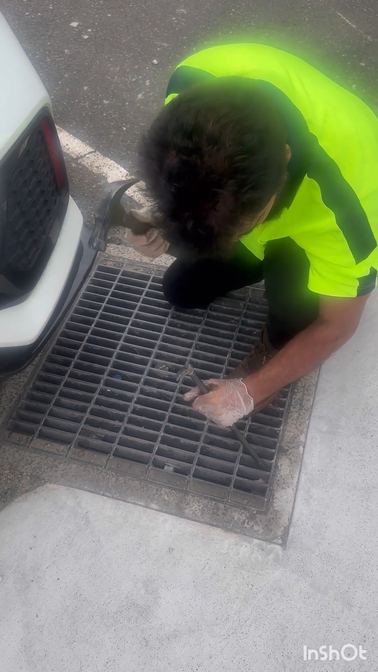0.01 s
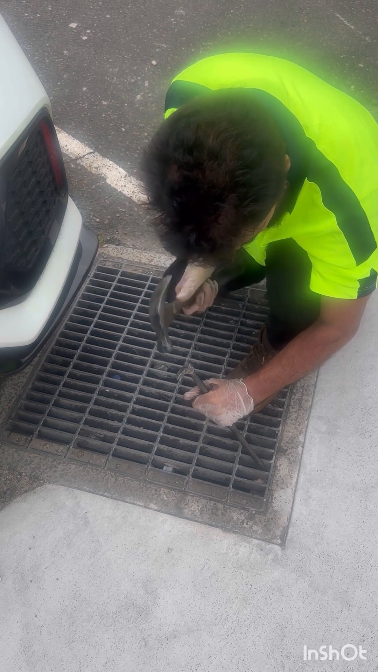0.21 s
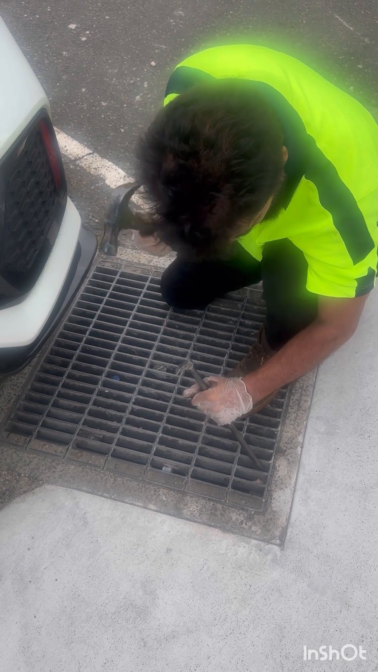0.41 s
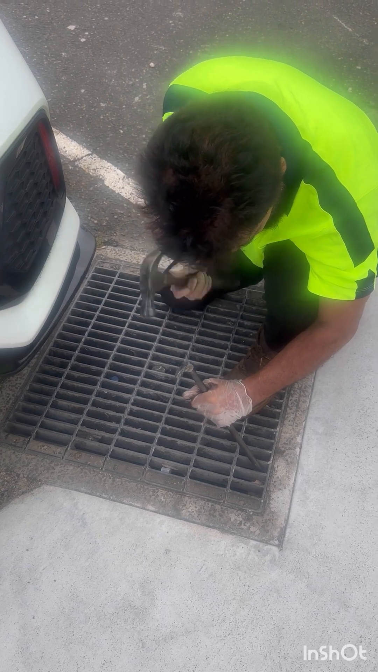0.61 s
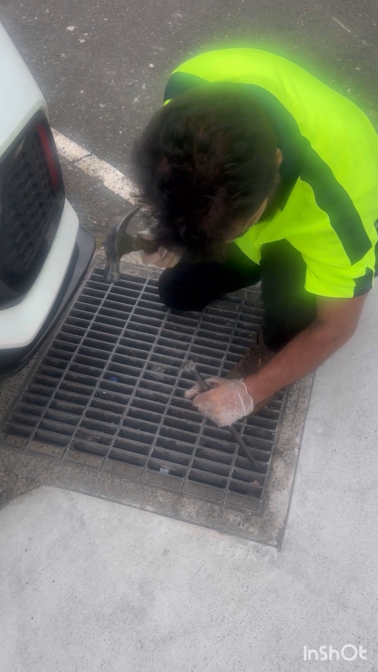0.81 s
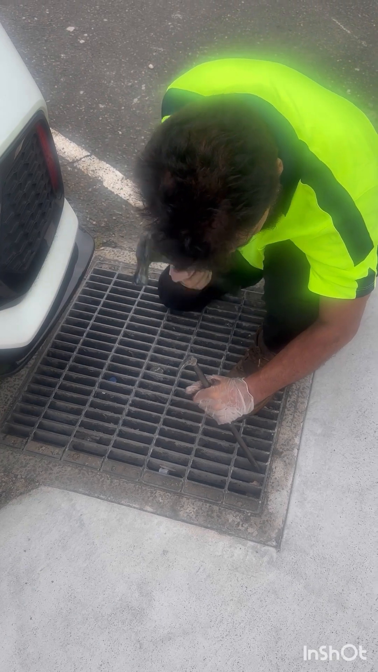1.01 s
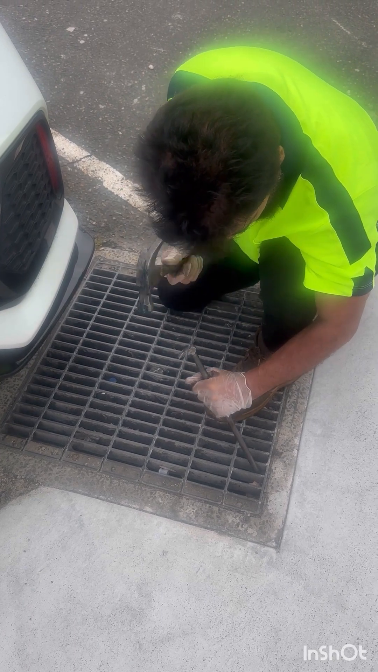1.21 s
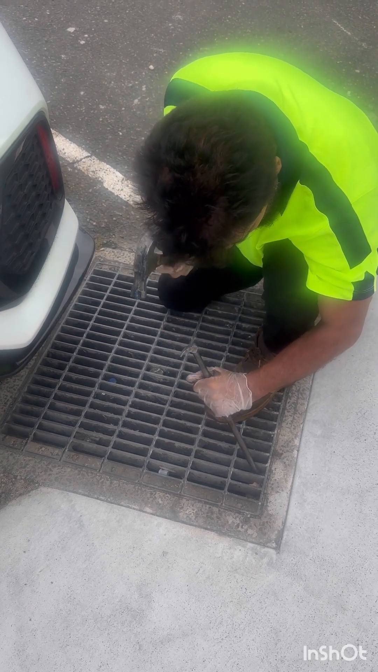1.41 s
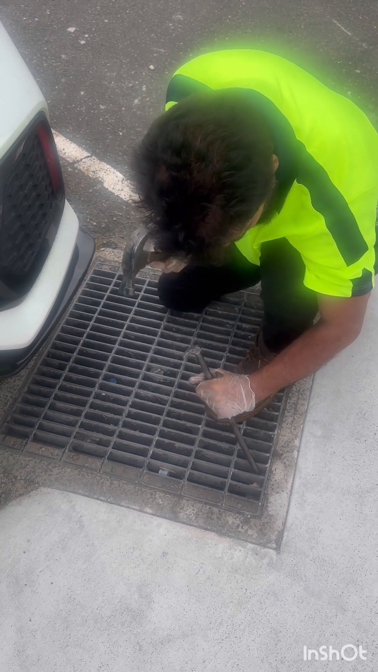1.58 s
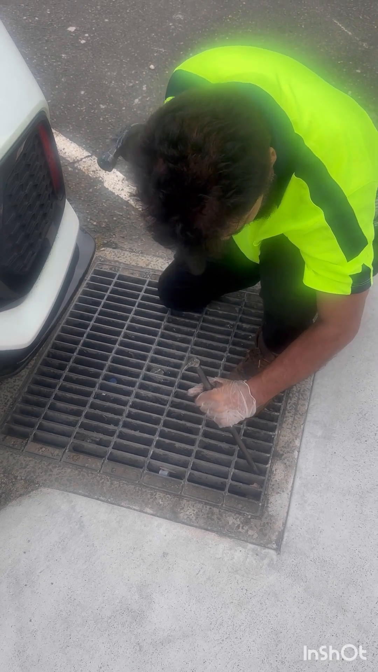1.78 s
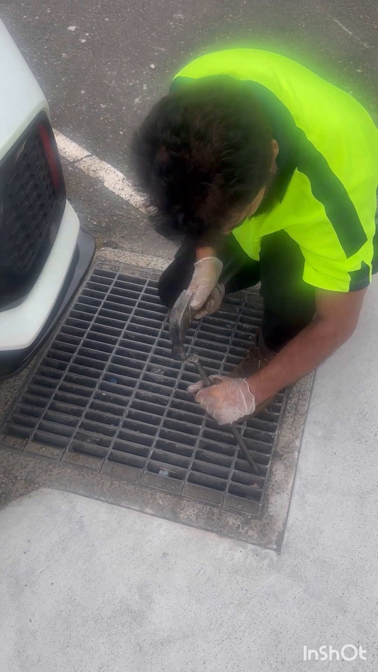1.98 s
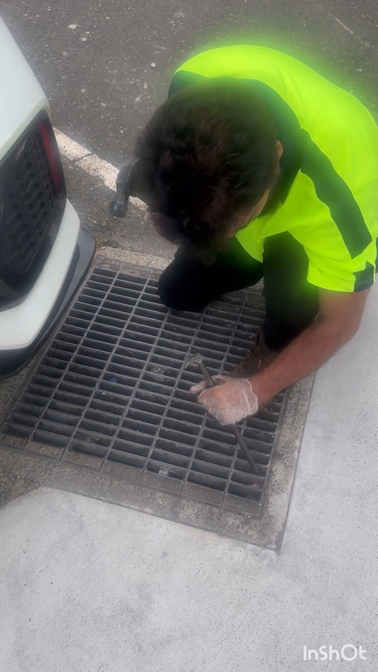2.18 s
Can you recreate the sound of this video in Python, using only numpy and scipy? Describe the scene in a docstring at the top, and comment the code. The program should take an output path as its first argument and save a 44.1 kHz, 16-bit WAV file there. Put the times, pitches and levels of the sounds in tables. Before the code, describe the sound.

A hammer strikes a steel bar wedged in a metal grate, four sharp clanking blows outdoors

```python
"""Far traffic rumbles throughout, as patchy filtered noise; the fading end of an earlier blow opens the scene.
Then a hammer strikes a steel bar wedged in a drain grate beside a parked car, close to the listener, four times.
Each blow is a noise crack, damped modes of bar and hollow, and rattling grate noise, echoed by car and street.
The first of the four also sends a low thump of falling pitch. Small knocks, made of noise bursts, and faint
wavering sine tones come between blows."""
import sys
import numpy as np
from scipy import signal
from scipy.fft import rfft, irfft, next_fast_len
from scipy.io import wavfile
from scipy.ndimage import uniform_filter1d, map_coordinates

SR = 44100
rng = np.random.default_rng(int(sys.argv[2]) if len(sys.argv) > 2 else 0)


def master(y):
    """Save y as 16-bit WAV."""
    cut = np.clip(np.atleast_2d(y).T, -1, 1)
    pcm = np.round(cut * 32767)  # scale
    wavfile.write(sys.argv[1], SR, pcm.astype(np.int16))


N = 97020
LEAD_IN_S = 1  # room ahead of the scene for a blow that falls before its start


def amp(db):
    """Level law: 20 dB is a factor of ten in amplitude."""
    return 10 ** (np.asarray(db) / 20)


def unit(x):
    """Normalisation to an RMS of one."""
    return x / np.sqrt(np.mean(x ** 2) + 1e-20)


def along(points, hz):
    """Interpolation of (Hz, value) points on a logarithmic frequency axis."""
    f, v = np.transpose(points)
    return np.interp(np.log(hz + 1), np.log(f + 1), v)


def filtered(x, response):
    """Linear filtering: the spectrum is multiplied by a response of frequency."""
    m = next_fast_len(x.shape[-1] + 8192)
    spectrum = rfft(x, m) * response(np.fft.rfftfreq(m, 1 / SR))
    return irfft(spectrum, m)[..., :x.shape[-1]]


def bump(centre_hz, sharpness):
    """Band-pass response, symmetric about its centre on a logarithmic frequency axis."""
    return lambda hz: 1 / (1 + (sharpness * np.log((hz + 1) / centre_hz)) ** 4)


def spread(pair, alike):
    """Interchannel coherence: mid and side shares set how alike left and right are at each frequency."""
    def shares(hz):
        turn = np.arccos(np.clip(along(alike, hz), -1, 1)) / 2
        return np.array([np.cos(turn), np.sin(turn)])

    mid, side = filtered(pair, shares)
    return np.array([mid + side, mid - side])


def dying(colour, decay, size):
    """Frequency-dependent damping: in a pair of noises each frequency dies at its own speed."""
    hz, t, z = signal.stft(rng.standard_normal((2, size)), SR, nperseg=256)
    level_db = along(colour, hz)[:, None] - 60 * t / along(decay, hz)[:, None]
    return signal.istft(z * amp(level_db), SR, nperseg=256)[1][:, :size]


def add_at(out, start_s, part):
    """Superposition: a part is added to the padded pair from its start time onward."""
    out[:, round((start_s + LEAD_IN_S) * SR):][:, :part.shape[1]] += part


def traffic():
    """Superposed random sources: patchy, partly coherent far noise over a deep rumble that swells by itself."""
    # Each row: frequency in Hz, relative spectral density of the far noise in dB per Hz.
    wash_colour = [(15, -60), (25, -32), (50, -8), (70, -5.5), (162, -14.5), (266, -10.5), (308, -21.5),
                   (446, -15.5), (530, -25), (630, -20), (2630, -38.5), (9000, -54), (11700, -100),
                   (19800, -120)]
    # Each row: time in seconds, level of the deep rumble in dB.
    rumble_level = [(0.0, -46.5), (0.2, -42.5), (0.54, -49), (0.77, -47.5), (1.07, -60), (1.57, -67.5),
                    (1.75, -50), (1.92, -49), (2.2, -50.5)]
    # Each row: frequency in Hz, likeness of left and right [0 to 1].
    alike_far = [(100, 1), (300, .9), (640, .2), (1200, 0), (1900, .6), (2700, .2), (5000, .1), (6200, .85),
                 (10000, .7)]
    wash_db, rumble_hz, patch_db = -52, 60, .5

    z = signal.stft(rng.standard_normal((3, N)), nperseg=512)[2]
    patches = uniform_filter1d(rng.standard_normal(z.shape[1:]), 5, 0)  # smoothed over frequency
    patches = uniform_filter1d(patches, 12, 1)  # and over time
    noise = signal.istft(z * amp(patch_db * unit(patches)), nperseg=512)[1][:, :N]
    colour = [(6, -46)] + wash_colour + [(10500, -120)]  # the last point silences all above 10.5 kHz
    wash = unit(filtered(spread(noise[:2], alike_far), lambda hz: amp(along(colour, hz))))
    low = unit(filtered(noise[2], bump(rumble_hz, 1.6)))
    rumble_db = np.interp(np.arange(N) / SR, *np.transpose(rumble_level))
    return amp(wash_db) * wash + amp(rumble_db) * low


def crack(t, db, t60):
    """Impact noise: a broadband burst with exponential decay."""
    # Each row: frequency in Hz, relative level in dB.
    crack_colour = [(150, -20.5), (600, -24.5), (1250, -12), (1900, -6.5), (2370, -14.5), (2900, -6.5),
                    (3900, -14.5), (4700, -17.5), (5900, -5.5), (6800, -2), (8200, -8), (10500, -17),
                    (13000, -24), (15500, -26.5)]
    noise = unit(filtered(rng.standard_normal((2, len(t))), lambda hz: amp(along(crack_colour, hz))))
    return amp(db - 60 * t / t60) * noise


def ringing(t):
    """Modal superposition: damped modes of bar and hollow, with new levels and wandering phases each time."""
    # Steel bar. Each row: mode frequency in Hz, mean level in dB before the blow's ring level, t60 in seconds.
    bar_modes = [(1145, -8, .2), (1220, -9, .12), (1370, -8, .15), (1772, -5, .14), (2020, -7, .1),
                 (2510, -12, .14), (2702, -10, .13), (3200, -10, .1), (3553, -11, .12), (4120, -12, .15),
                 (5030, -11, .16), (5940, -10, .07), (6180, -6, .22), (6745, -7, .26), (7330, -12, .12),
                 (7660, -12, .12), (8220, -10, .2), (14550, -22, .1), (15600, -22, .08)]
    # Hollow under the grate. Each row: the same three columns in Hz, dB and seconds.
    pit_modes = [(105, -10, 0.17), (288.9, -7, 0.13), (518, -15.5, 0.12), (648.3, -1, 0.027),
                 (896, -7.5, .07)]
    blur_hz = 26  # the wedged bar chatters: line width that the phase walk gives each mode

    hz, db, t60 = np.transpose(bar_modes + pit_modes)
    gains = amp(db[:, None] + rng.normal(0, 3, (2, len(hz), 1)) - 60 * t / t60[:, None])
    walk = rng.standard_normal((len(hz), len(t))).cumsum(axis=1) * np.sqrt(2 * np.pi * blur_hz / SR)
    start_phase = rng.uniform(0, 2 * np.pi, (2, len(hz), 1))
    return (gains * np.sin(2 * np.pi * np.outer(hz, t) + walk + start_phase)).sum(axis=1)


def grate(t):
    """Random amplitude modulation: a rattle roughens noise that dies at its own speed at each frequency."""
    # Each row: frequency in Hz, level in dB before the gain below.
    grate_colour = [(120, -18.5), (310, -12.5), (450, -18.5), (800, -19), (1300, -7.5), (1950, -3),
                    (2370, -9), (2750, -5), (3500, -3), (5000, -1.5), (6700, -13), (8500, -13),
                    (10500, -16.5), (12000, -30), (15500, -33.5)]
    # Each row: frequency in Hz, t60 in seconds.
    grate_decay = [(300, 0.4), (1500, 0.15), (5000, 0.15), (10000, 0.31), (15000, .08)]
    gain_db = 12  # over the bar's ring
    grit_db, grit_per_s = 3.5, 200  # depth of the rattle, new random levels per second

    grit = amp(grit_db * map_coordinates(rng.standard_normal(400), [t * grit_per_s]))
    return amp(gain_db) * grit * dying(grate_colour, grate_decay, size=len(t))


def street(x):
    """Diffuse reverberation: convolution with a decaying noise tail."""
    # Each row: frequency in Hz, t60 in seconds.
    street_decay = [(500, .35), (2000, 0.73), (6500, 0.75), (8500, 0.64), (10500, 0.41), (15000, .2)]
    tail = dying([(1000, 0)], street_decay, size=SR)  # starts with a flat spectrum
    return signal.fftconvolve(x, tail / np.linalg.norm(tail[0]), axes=1)


def blows():
    """Impact excitation and reflection: crack, bar and grate, each blow with near echoes and a street tail."""
    # Each row: start in seconds, crack level in dB, crack t60 in seconds, ring level in dB, street tail in dB,
    # then seven colour gains in dB, applied to crack and ring alike. The first blow falls before the start.
    blow_rows = [(-.21, -3.5, 0.021, -21.5, -24, 20.5, 23.5, -1.8, -3.5, 0, -0.34, 1),
                 (0.21, 0, 0.0088, -26.5, -23, 2.5, -2.5, -2.5, -1, -5, 0, 5),
                 (0.6236, -3.5, 0.012, -27.5, -27, -4.5, -2.5, 0.38, -0.5, -2, 0.86, 4),
                 (1.033, -8, .03, -26.5, -28.5, 2.5, -0.5, 2, 5, 2.4, -1, 8),
                 (1.925, -2.5, 0.023, -28.5, -31, -2, 0, 0.26, -7, -1.4, -0.33, -4.5)]
    # Frequencies in Hz of the seven colour gains.
    colour_hz = [300, 750, 1400, 2350, 3600, 7000, 15000]
    rise_s = .0004
    car_s, car_db = .0145, -7  # first echo
    wall_s, wall_db = .043, -21  # later echo
    street_s = .02

    out, t = np.zeros((2, N + 3 * SR)), np.arange(SR // 3) / SR
    for s, crack_db, crack_t60, ring_db, street_db, *colour in blow_rows:
        hit = crack(t, crack_db, crack_t60) + amp(ring_db) * (ringing(t) + grate(t))
        hit = hit * (1 - np.exp(-t / rise_s))
        points = list(zip(colour_hz, colour))
        hit = filtered(hit, lambda hz: amp(along(points, hz)))
        echo = signal.lfilter([.3], [1, -.7], hit)  # reflection dulls the treble
        add_at(out, s, hit)
        add_at(out, s + car_s, amp(car_db) * echo)
        add_at(out, s + wall_s, amp(wall_db) * echo[::-1])  # left and right swapped
        add_at(out, s + street_s, amp(street_db) * street(hit))
    return out


def thump():
    """Chirp with pitch inversely proportional to time: a low swing that swells and dies."""
    start_s, crest_s = .2105, .0165  # crest_s counts from the start
    cycles = 1.5  # pitch in Hz times seconds since the start
    crest_db = -12  # of the main swell
    early, early_s = .75, .0045  # share and decay time of the first quick swings

    t = np.clip(np.arange(N) / SR - start_s, 1e-9, None)
    u = t / crest_s
    swell = u ** 4 * np.exp(4 - 4 * u)
    quick = early * np.exp(-t / early_s) * np.clip(t / 0.0021 - 1, 0, 1)
    return amp(crest_db) * (swell + quick) * np.cos(2 * np.pi * cycles * np.log(u))


def tones():
    """Slow amplitude and frequency modulation: faint sine tones waver, fade in and fade out."""
    # Each row: start in seconds, end in seconds, mean frequency in Hz, mean level in dB between the fades.
    tone_rows = [(.27, .425, 49, -33), (.75, 1.45, 462, -64), (2.11, 2.3, 2100, -77)]
    fade_s, drift_per_s = .025, 14

    t, out = np.arange(N) / SR, np.zeros(N)
    for start, end, hz, db in tone_rows:
        place = t * drift_per_s
        level_drift, pitch_drift = map_coordinates(
            rng.standard_normal((2, 40)), [[0 * t, 0 * t + 1], [place, place]])
        gate = np.clip(np.minimum(t - start, end - t) / fade_s, 0, 1)
        phase = 2 * np.pi * np.cumsum(hz * (1 + 0.024 * pitch_drift)) / SR
        out += amp(db + 3.3 * level_drift) * gate * np.sin(phase)
    return out


def knocks():
    """Band-limited impact noise: small knocks are noise bursts with exponential decay."""
    # Each row: start in seconds, level in dB before the stereo image, centre frequency in Hz, t60 in seconds.
    knock_rows = [(1.186, -50, 1950, .09), (.305, -29, 160, .05)]
    out, t = np.zeros((2, N + 3 * SR)), np.arange(SR // 3) / SR
    for s, db, hz, t60 in knock_rows:
        noise = filtered(rng.standard_normal((2, len(t))), bump(hz, 2.2))
        add_at(out, s, amp(db - 60 * t / t60) * unit(noise))
    return out


def near_image(padded):
    """Stereo localisation: near sounds get a coherence and a left-right balance at each frequency."""
    # Each row: frequency in Hz, likeness of left and right [0 to 1].
    alike_near = [(120, 1), (300, .95), (900, .3), (1900, .93), (3000, .75), (4700, .4), (5900, .96),
                  (10500, 1), (13300, 1), (15500, .8)]
    # Each row: frequency in Hz, left over right in dB.
    left_over_right = [(400, 0), (900, 5.5), (1900, 2), (3000, 5), (5500, .5), (7000, 0)]
    first = LEAD_IN_S * SR
    pair = spread(padded[:, first:first + N], alike_near)
    return filtered(pair, lambda hz: amp(np.outer([.5, -.5], along(left_over_right, hz))))


def scene():
    """Superposition of all sources."""
    return traffic() + near_image(blows() + knocks()) + thump() + tones()


def record(dry):
    """Phase difference, saturation and band limit: two ports hear treble out of step and peaks round off."""
    # Frequencies in Hz of the phase leads below.
    port_hz = [5300, 10300, 10550, 13300, 13500, 15500]
    # Lead of the right port over the left in cycles, one value at each frequency above.
    port_turns = [0, .4, .5, .5, .58, .75]
    ceiling, top_hz = .95, 16300  # amplitude that rounded peaks approach, band limit

    def lead(hz):
        return np.exp(np.outer([-1j, 1j], np.pi * np.interp(hz, port_hz, port_turns)))

    x = filtered(dry, lead)
    x = x / (1 + np.abs(x / ceiling) ** 4) ** .25
    return filtered(x, lambda hz: 1 / (1 + (hz / top_hz) ** 100))


dry = scene()
out = record(dry)
master(out)
```